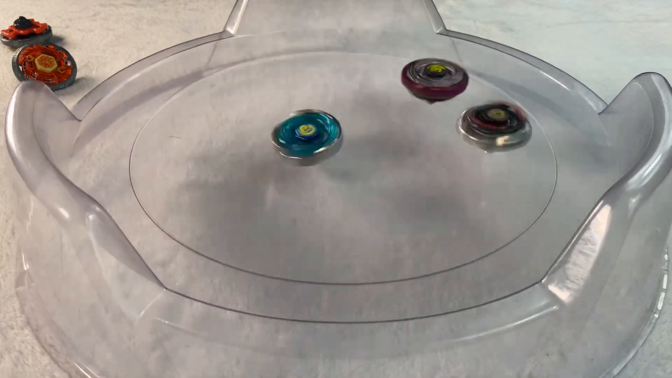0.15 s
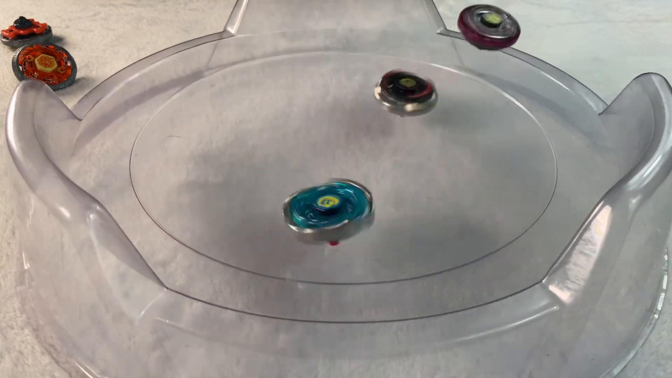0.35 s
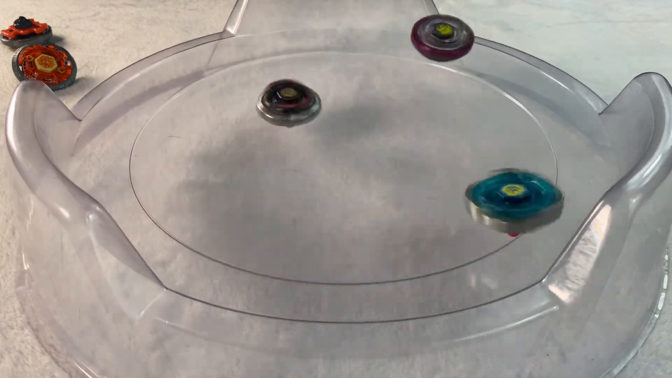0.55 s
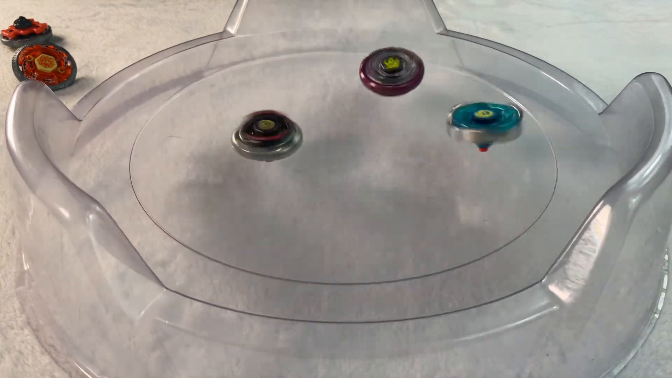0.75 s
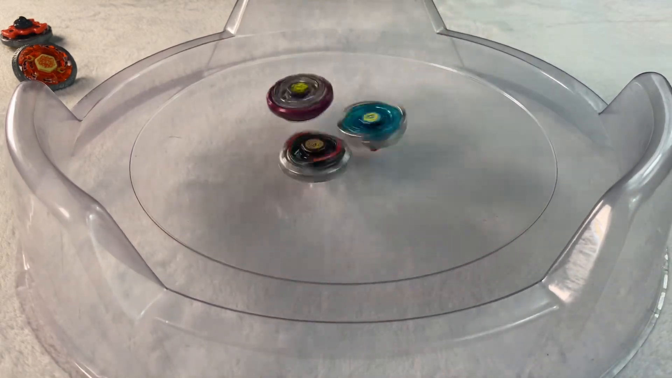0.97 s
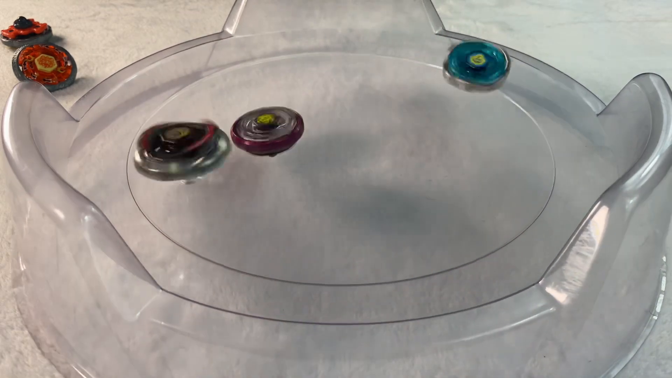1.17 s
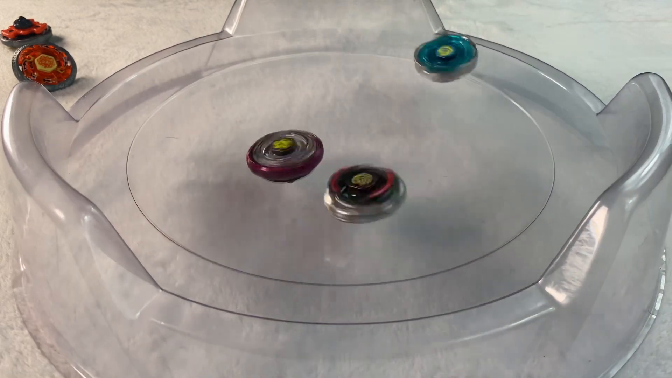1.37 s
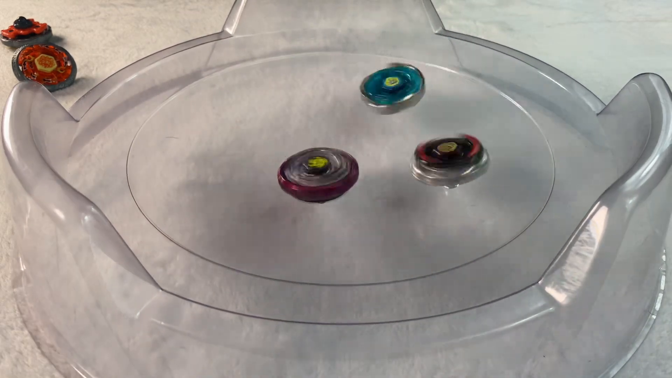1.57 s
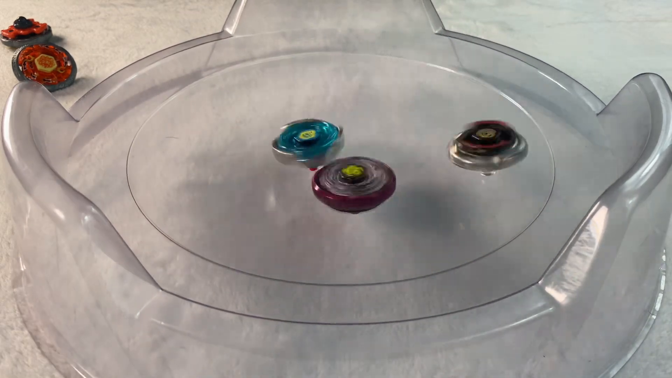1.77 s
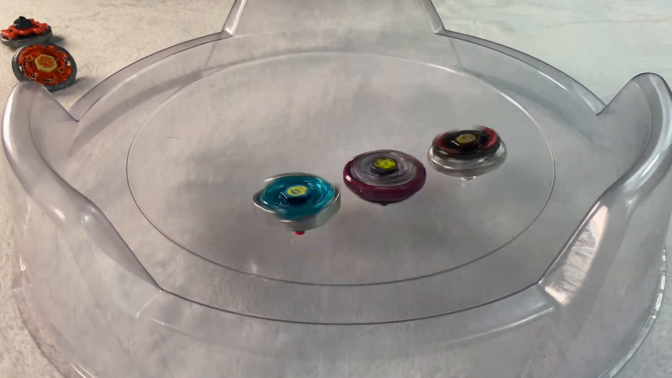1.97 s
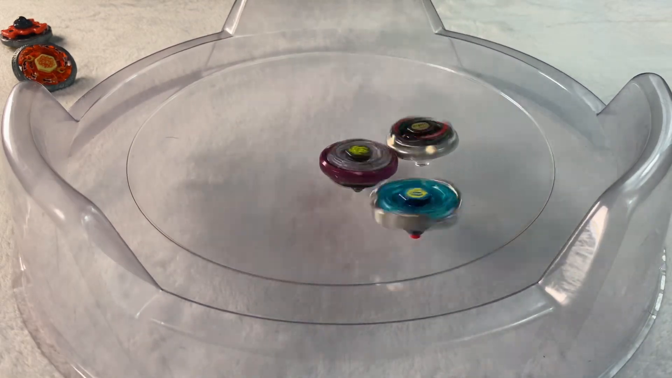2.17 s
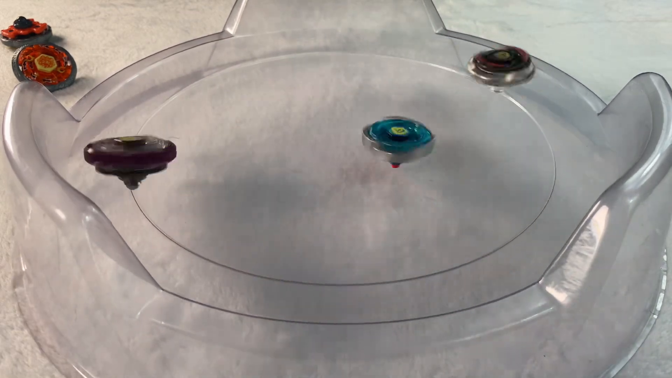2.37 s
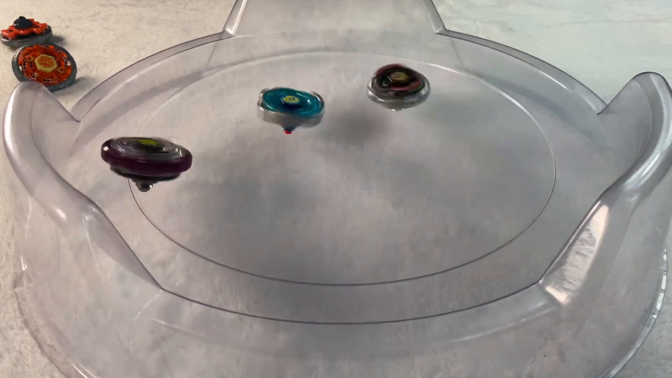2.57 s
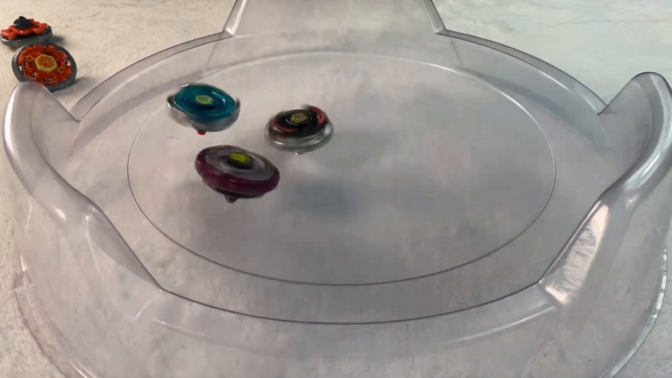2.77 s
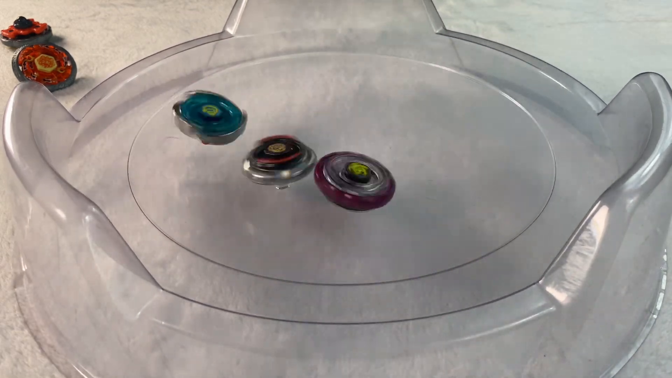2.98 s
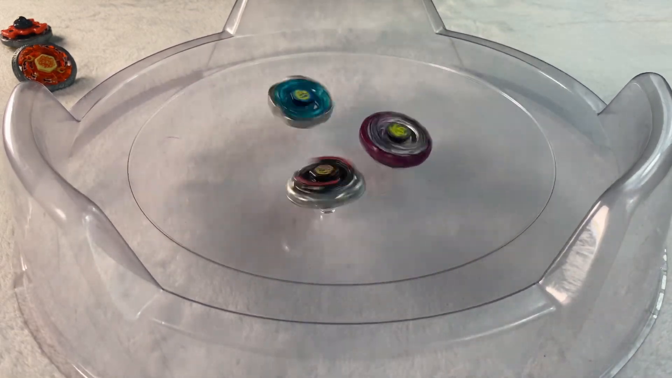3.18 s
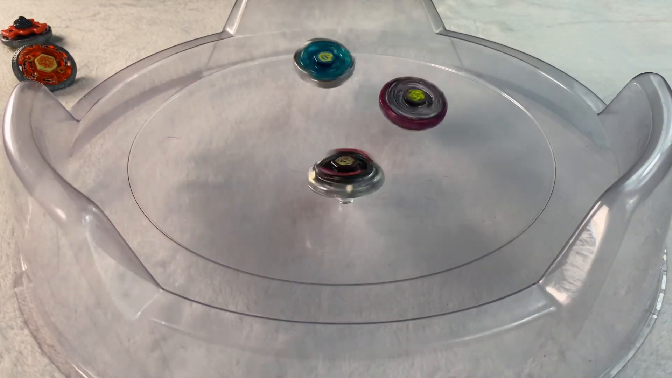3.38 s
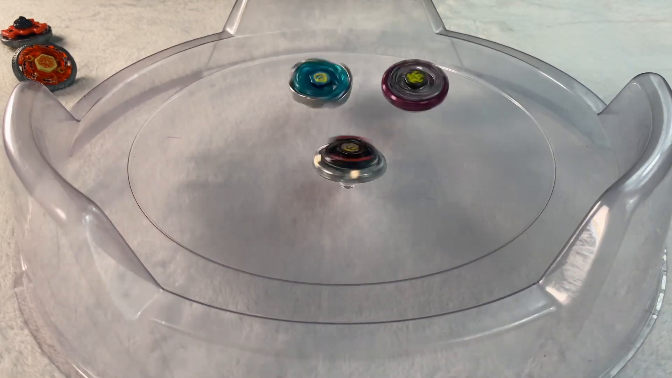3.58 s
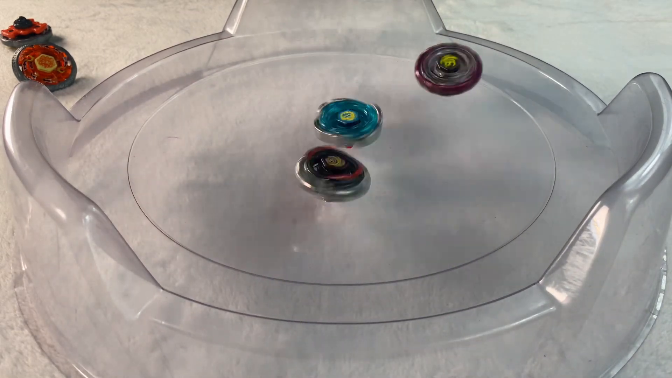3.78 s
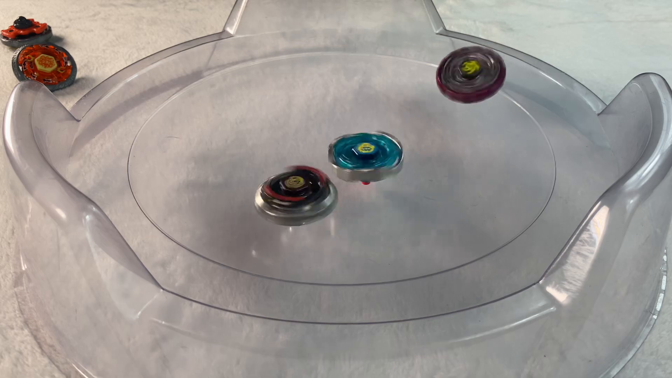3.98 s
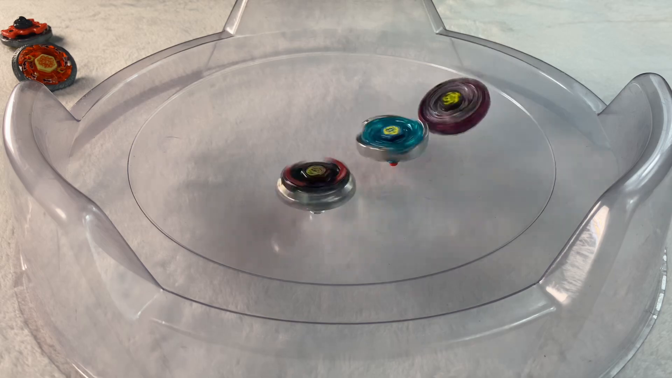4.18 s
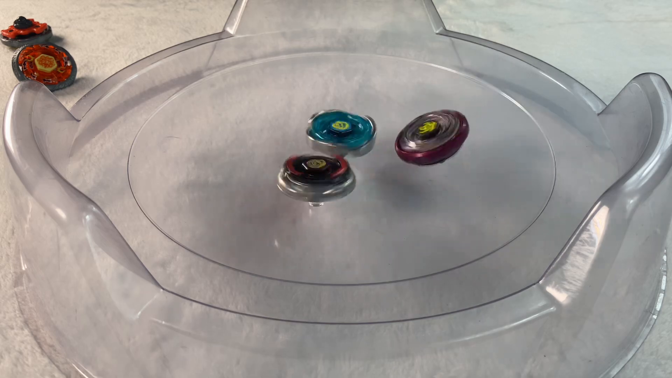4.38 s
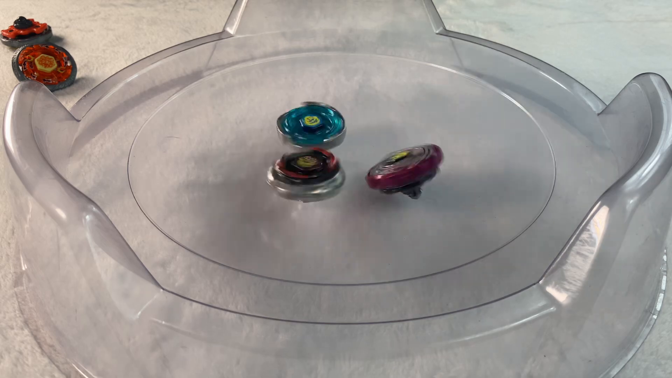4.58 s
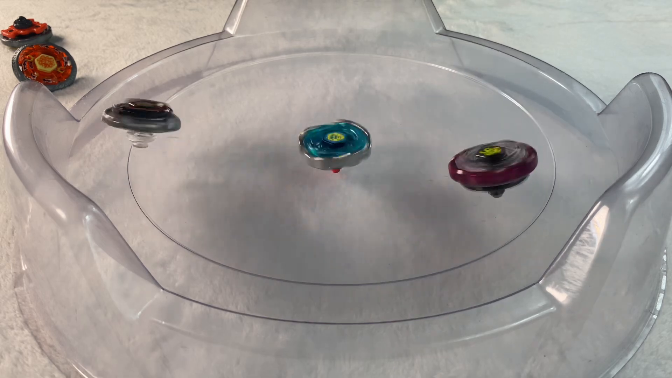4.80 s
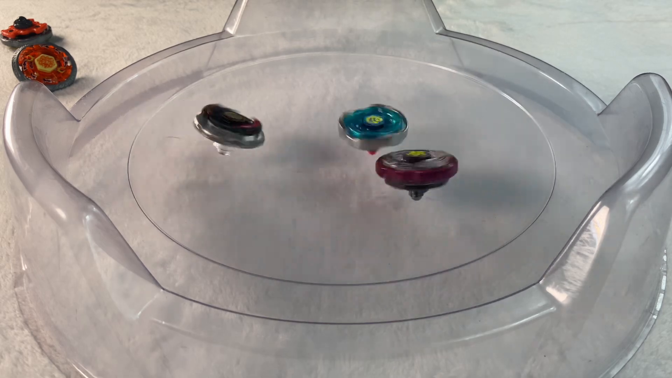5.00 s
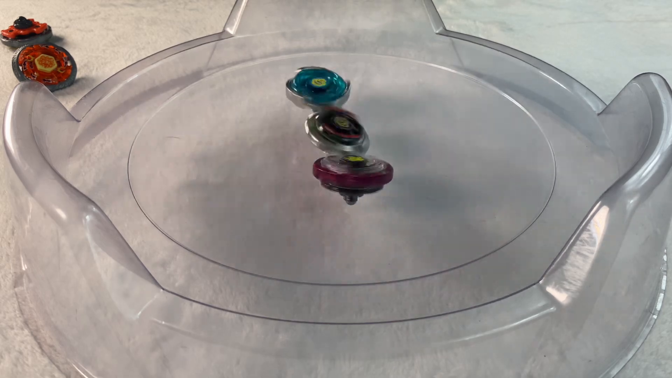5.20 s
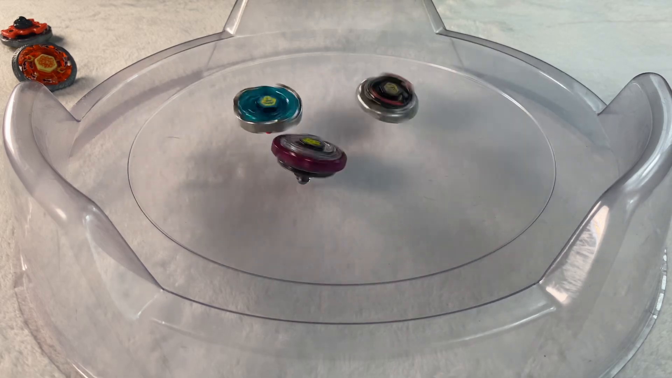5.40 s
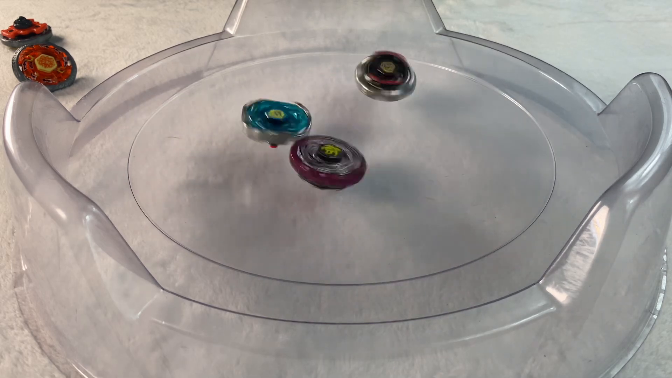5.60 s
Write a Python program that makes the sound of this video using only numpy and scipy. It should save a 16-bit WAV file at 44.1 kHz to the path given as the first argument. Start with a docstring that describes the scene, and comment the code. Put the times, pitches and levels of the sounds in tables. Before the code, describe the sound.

Metal tops spin in a hollow plastic bowl, heard very close in stereo in a small room. A low rumble and gritty scrape flutter about fifty times a second, rising and sinking throughout. Two bright metallic clashes crack at 0.14 and 0.26 s, followed by light ticks and knocks. Clashes at 0.85, 0.94 and 1.0 s lead to a hard plastic knock at 1.09, then a double clack with a boomy thump near 1.3. Single clicks fall at 1.7 and 2.0; a strong clash at 2.2 sets off skittering ticks. Lighter hits come at 2.76 and around 3.1, then rapid ticking from 3.3 to 3.7. A tight cluster of clashes rings at 3.75, with smaller clicks until 4.4. A clash at 4.6 brings a rattle of knocks until 4.9. Further hits sound at 5.0 and 5.45, ticks between, and the loudest ringing clash at 5.62 ends it.

```python
"""Low rumble, scrape and ticks are heard first, then the clashing and ringing rims of three metal spinning tops.
They run in a thin plastic bowl, close to a two-port microphone in a small room. Rims are noise bursts with
damped sines; landings, ticks and rolling are forces filtered by resonances; decaying noise is the room's answer."""
import sys
import numpy as np
from scipy import signal
from scipy.fft import rfft, irfft, next_fast_len
from scipy.io import wavfile
from scipy.ndimage import uniform_filter1d, map_coordinates

SR = 44100
rng = np.random.default_rng(int(sys.argv[2]) if len(sys.argv) > 2 else 0)


def pcm_store(signal):
    """Save signal as 16-bit PCM."""
    levels = np.round(np.clip(np.atleast_2d(signal), -1, 1) * 32767)
    wavfile.write(sys.argv[1], SR, levels.astype(np.int16).T)


N = 249158

# Noise spectrum of a hard contact. Each row: frequency in Hz, relative density in dB per Hz.
CRACK = [(350, -57), (600, -37.5), (1340, -8), (2410, -0.5), (3190, -9), (5050, -3), (6130, -9.5),
         (8930, -10), (10700, -12), (12100, -12), (13200, -25), (15100, -41), (16700, -69.5)]


def amp(db):
    """Level to gain: 20 dB is a factor of ten in amplitude."""
    return 10 ** (np.asarray(db) / 20)


def unit(x):
    """Normalization by the root mean square, to rms 1."""
    return x / np.sqrt(np.mean(x ** 2, axis=-1, keepdims=True) + 1e-20)


def along(points, hz):
    """Interpolation of (Hz, value) points on a logarithmic frequency axis."""
    f, v = np.transpose(points)
    return np.interp(np.log(hz + 1), np.log(f + 1), v)


def filtered(x, response):
    """Linear filtering: the spectrum is multiplied by a complex response of frequency."""
    n = x.shape[-1]
    m = next_fast_len(n + 4096, True)
    return irfft(rfft(x, m) * response(np.fft.rfftfreq(m, 1 / SR)), m)[..., :n]


def wobble(rate):
    """Slow random modulation: a smooth curve through random knots, rate of them a second."""
    knots = rng.standard_normal(int(N * rate / SR) + 4)
    return map_coordinates(knots, [np.arange(N) * rate / SR])


def add(track, s, sound):
    """Superposition: a sound is mixed in at a time in seconds."""
    at = round(s * SR)
    track[..., at:at + sound.shape[-1]] += sound


def ringing(hz, db, t60, t):
    """Modal sum: sines with exponential decay."""
    return np.sum(amp(np.c_[db] - 60 * t / np.c_[t60]) * np.sin(2 * np.pi * np.c_[hz] * t), axis=0)


def bowl(hz, lo_hz, hi_hz):
    """Modal response: the bowl's resonances between two frequencies, summed with alternating sign."""
    # Modes of the plastic bowl. Each row: frequency in Hz, width in Hz, level in dB.
    bowl_modes = [(58, 24, -7), (79, 12, 2), (125, 40, -5.5), (170, 50, -9), (257, 40, -3), (322, 40, -1),
                  (380, 35, -1), (450, 35, -10), (562, 45, -7), (725, 40, -2), (850, 45, -3), (985, 45, -5),
                  (1116, 45, -4), (1220, 50, -6), (1500, 120, -11)]
    return sum((-1) ** k * amp(db) * 1j * hz * w / (c * c - hz * hz + 1j * hz * w)
               for k, (c, w, db) in enumerate(bowl_modes) if lo_hz <= c < hi_hz)


def air():
    """Partly coherent background noise: the room rumbles low and steadily, partly alike at both ports."""
    # Rumble spectrum. Each row: frequency in Hz, relative density in dB per Hz.
    rumble_spectrum = [(20, -23.5), (40, -10.5), (60, 1), (90, -5.5), (140, -27.5), (300, -58)]
    near, far = rng.standard_normal((2, N))
    noise = near + .3 * far * np.c_[[1, -1]]
    return amp(-48) * unit(filtered(noise, lambda hz: amp(along(rumble_spectrum, hz))))


def room(x):
    """Reverberation: each frequency dies at its own speed, with a new tail every third of a second."""
    # Reverberation of the room. Each row: frequency in Hz, t60 in seconds.
    room_t60 = [(200, 0.13), (2000, 0.31), (6000, 0.27), (12000, 0.16), (13500, 0.033), (16000, 0.041)]
    out, step = np.zeros((2, N + 2 * SR)), SR // 3
    for at in range(0, N, step):
        hz, t, z = signal.stft(rng.standard_normal((2, SR // 2)), SR, nperseg=256)
        decay = amp(-60 * t / along(room_t60, hz)[:, None])
        tail = signal.istft(z * decay, SR, nperseg=256)[1]
        tail = tail / np.linalg.norm(tail[0])
        answer = signal.fftconvolve(x[None, at:at + step], tail, axes=1)
        add(out, at / SR + 0.004, answer)  # the answer starts 4 ms late
    return out[:, :N]


def rolling():
    """Rotating imbalance: tops press on the bowl once a turn, so rumble and scrape throb at the spin rate."""
    # Tips rolling on the bowl. Each row: time in seconds, then boom, drum and scrape before balance, in dB.
    roll_levels = [(0.0, -43, -52, -50), (0.11, -47, -43, -52.5), (0.31, -46.5, -49.5, -49.5),
                   (0.71, -53.5, -50.5, -55.5), (0.91, -54.5, -55.5, -64.5), (1.05, -54, -51.5, -46),
                   (1.18, -50, -44, -47), (1.3, -44.5, -51, -54.5), (1.48, -43, -56.5, -51.5),
                   (1.64, -45, -47, -60), (1.809, -52.5, -53.5, -55.5), (2.05, -52.5, -60.5, -72),
                   (2.25, -46, -59, -51.5), (2.39, -43.5, -51, -52), (2.67, -49, -46, -53),
                   (2.819, -40, -49.5, -53), (3.4, -62, -59, -61), (3.65, -55, -54, -60.5),
                   (3.81, -40, -43, -49.5), (3.98, -63, -57, -59.5), (4.25, -43.5, -54, -56),
                   (4.83, -71, -57, -57.5), (5.07, -39, -46, -55.5), (5.27, -51, -45, -54),
                   (5.46, -46.5, -47, -57.5), (5.65, -62, -60, -65)]
    # Hiss of the tips. Each row: time in seconds, level before balance in dB.
    hiss_levels = [(0.0, -55.5), (0.28, -46.5), (0.49, -57), (0.69, -62.5), (0.89, -64), (1.02, -45),
                   (1.26, -59), (1.35, -62), (1.51, -65.5), (1.81, -64), (2.06, -76), (2.25, -47),
                   (2.41, -60), (2.55, -57), (3.02, -59), (3.13, -75), (3.29, -64.5), (3.41, -54),
                   (3.68, -81.5), (3.81, -48), (4.06, -62), (4.34, -57), (4.47, -61), (4.86, -60),
                   (5.4, -68.5), (5.65, -51)]
    # Spectrum of scrape and hiss. Each row: frequency in Hz, relative density in dB per Hz.
    scrape_spectrum = [(290, -45.5), (500, -12.5), (797, -12.5), (926, -16.5), (1080, -14), (1420, -15),
                       (1860, -15.5), (2190, -20.5), (4290, -10.5), (5720, 1), (5960, -6), (9250, -16.5),
                       (11200, -10), (13200, -36.5), (14000, -83)]
    spin_hz = 51.8  # mean; the rate wanders around it

    s, *columns = np.transpose(roll_levels)
    t = np.arange(N) / SR
    levels = [np.interp(t, s, column) for column in columns]
    levels = np.array(levels + [np.interp(t, *np.transpose(hiss_levels))])

    turn = np.cumsum(spin_hz * (1 + 0.1564 * wobble(6))) / SR

    def press(depth_db):
        return amp(depth_db * np.cos(2 * np.pi * turn) + 1.5 * wobble(25))

    # tips graze in small bursts, one a turn, of random strength
    strength = amp(4 * rng.standard_normal(int(turn[-1]) + 1))
    graze = strength[turn.astype(int)] * np.exp(-(turn % 1) / .12)
    rub = press(1.3) + 1.2 * graze

    near, far = rng.standard_normal((2, 4, N))
    force = near + np.c_[[.2, .25, .5, .3]] * far * [[[1]], [[-1]]]  # part differs from port to port
    force = force * amp(2.5 * wobble(18)) * [press(.5), press(1.5), rub, rub]

    def parts(hz):
        high = 1 / (1 + (3200 / (hz + 1)) ** 6)
        rasp = amp(along(scrape_spectrum, hz)) * (1 + 0.32 * abs(bowl(hz, 500, 2000)))
        return np.array([bowl(hz, 0, 200), bowl(hz, 200, 500), rasp * (1 - high), rasp * high])

    balance_db = np.c_[[3, 2, 2.5, -1.5]]  # boom, drum, scrape, hiss
    return np.sum(unit(filtered(force, parts)) * amp(levels + balance_db), axis=1)


def ticks():
    """Impact excitation: a tip's landing or skip excites a short resonance at its pitch, with a bright edge."""
    # Tips on the plastic. Each row: start in seconds, level before balance in dB, pitch in Hz,
    # bright edge over the knock before balance and scatter in dB.
    tip_skips = [(0.0648, -47, 2010, -18), (0.1446, -22.5, 3960, -3), (0.3618, -31.5, 1900, -4.5),
                 (0.4479, -40, 1950, -7.5), (0.467, -48, 2500, -4), (0.4873, -38.5, 1920, -6.5),
                 (0.5084, -48, 2840, -8), (0.622, -36.5, 1940, -3.5), (0.788, -49, 2660, -6),
                 (1.0853, -15, 3830, -12), (1.1014, -17, 2000, -3), (1.1846, -33.5, 3400, -17),
                 (1.249, -31.5, 1810, 4), (1.3653, -31, 1720, -4.5), (1.4107, -31.5, 1570, -3),
                 (1.4489, -32.5, 1740, -0.5), (1.5208, -45.5, 1700, 0.5), (1.5454, -43.5, 1880, -2),
                 (1.988, -48.5, 3000, 2), (2.007, -46, 3000, -3), (2.2734, -36, 2550, -1),
                 (2.3009, -37.5, 4940, 3.5), (2.3585, -39.5, 1960, -0.5), (2.385, -30.5, 4480, -4),
                 (2.4, -31, 3000, -11), (2.4098, -29, 4180, -24), (2.4174, -40.5, 2470, 5.5),
                 (2.474, -37.5, 2530, -24), (2.5007, -48, 1990, -13), (2.5464, -40, 2680, -8),
                 (2.5726, -40.5, 2000, -7.5), (2.8883, -46.5, 1930, 0), (2.93, -42.5, 4240, -22),
                 (2.9743, -45, 1920, -5), (3.0254, -53, 1740, -9), (3.288, -50, 2500, -24),
                 (3.3111, -34.5, 2500, -14.5), (3.331, -34.5, 2490, -15), (3.3473, -34.5, 2750, -12),
                 (3.367, -40, 3020, -17), (3.3832, -36, 2900, -11), (3.4027, -35, 3150, -20),
                 (3.418, -40.5, 3100, -5), (3.4398, -37.5, 2860, -17.5), (3.4554, -42.5, 2600, -16),
                 (3.49, -46.5, 3100, -7.5), (3.513, -53, 3180, -14.5), (3.5862, -38, 2430, -10),
                 (3.6107, -33, 2360, -16), (3.6282, -36, 2650, -5), (3.644, -39.5, 2740, -1),
                 (3.6624, -37, 2500, -7), (3.681, -37, 3100, -2.5), (3.8164, -44, 3620, -8.5),
                 (3.8364, -48, 2000, -13), (3.8517, -32.5, 2010, -9), (3.8701, -31, 2030, -8),
                 (3.9007, -38.5, 3420, -18), (3.9144, -43, 3220, -11), (3.9794, -44, 3590, -26),
                 (4.0013, -49, 3600, -9), (4.0415, -46, 1640, -6.5), (4.082, -46, 1770, 4.5),
                 (4.124, -43.5, 3120, 0.5), (4.5361, -40, 1550, -14), (4.665, -31, 2000, -5),
                 (4.6977, -35, 4350, -1), (4.7237, -30.5, 1720, -2.5), (4.7606, -39, 4820, 4.5),
                 (4.789, -33.5, 4990, -7), (4.8111, -33.5, 3800, 1), (4.8177, -36, 4400, -8),
                 (4.8324, -35, 2790, -15), (4.8498, -37, 1930, -3), (4.8704, -44, 2790, -18),
                 (4.9, -38.5, 3010, -9), (4.9303, -37, 2410, -6.5), (5.1756, -34, 1700, -9.5),
                 (5.1995, -40, 1730, -3), (5.222, -30.5, 1640, -14), (5.241, -39, 1650, -27),
                 (5.2848, -40.5, 1630, -5.5), (5.3248, -45.5, 2460, 1.5), (5.3688, -36, 1620, -9),
                 (5.3971, -32, 1810, -5.5), (5.418, -42, 4100, -7)]
    graze_s = .004
    out, t = np.zeros(N + SR), np.arange(SR // 25) / SR
    decay = amp(-60 * t / 0.11) * (1 - np.exp(-(t / 0.00013) ** 2))
    for s, db, pitch, edge_db in tip_skips:
        def body_and_edge(hz):
            resonance = 1j * hz * pitch / (pitch ** 2 - hz ** 2 + 1j * hz * .42 * pitch)
            plastic = 1.5 * pitch * bowl(hz, 1000, 2000) / 1000  # the bowl's upper modes
            bright = amp(along(CRACK, hz)) * (hz > 2200) * (hz < 12800)
            return np.array([resonance ** 2 + plastic, bright])

        drag = .03 + .3 * (t < graze_s) * np.sin(np.pi * t / graze_s)  # the tip drags briefly
        force = drag * rng.standard_normal(len(t))
        force[round(.0004 * SR)] = 1  # the impact
        body, edge = unit(filtered(force, body_and_edge) * decay)
        edge_gain = amp(edge_db + 5 + 1.5 * rng.standard_normal())
        add(out, s, amp(db - 20.0) * (body + edge_gain * edge))
    return out[:N]


def drops():
    """Dispersion: a landing pushes the bowl; bending waves are slower in the bass, so the boom trails the slap."""
    # Tops land on the bowl or hit its wall. Each row: start in seconds, then levels before balance
    # of knock, boom, drum and slap in dB.
    landings = [(0.264, -32, -66, -40, -50.5), (0.31, -31.5, -38, -36, -47.5), (0.33, -43, -37, -33.5, -45),
                (0.358, -34.5, -37, -32.5, -50), (0.449, -43, -40, -40, -49),
                (0.62, -30, -48.5, -36.5, -44), (1.003, -40.5, -32.5, -32.5, -42.5),
                (1.032, -44.5, -32, -36.5, -41), (1.086, -11, -38.5, -21.5, -28),
                (1.1, -20.5, -35, -33, -27), (1.248, -28.5, -20.5, -24.5, -34),
                (1.282, -40.5, -33, -43, -55), (1.306, -41, -39, -35, -47), (1.364, -38.5, -25, -33.5, -40),
                (1.411, -37.5, -29.5, -37.5, -46.5), (1.447, -38, -31.5, -37, -48.5),
                (1.474, -43, -35, -41, -58.5), (1.694, -35.5, -48, -44, -42.5),
                (2.204, -41.5, -32, -33, -47.5), (2.231, -46.5, -31, -44, -45.5),
                (2.271, -36, -31.5, -37, -47.5), (2.302, -31, -33, -27.5, -47.5),
                (2.357, -44, -48.5, -36, -48), (2.386, -25.5, -46, -34, -43.5),
                (2.407, -29, -54, -41, -44.5), (2.419, -40.5, -54.5, -33, -67),
                (2.574, -32.5, -48.5, -38, -62), (3.134, -40.5, -40, -38, -53),
                (3.816, -44.5, -36.5, -44, -49.5), (3.853, -46, -32, -39.5, -41.5),
                (3.872, -34, -49.5, -35, -42.5), (3.887, -45, -36, -39.5, -44),
                (3.914, -37.5, -33, -37.5, -42.5), (4.611, -37, -32, -35.5, -39),
                (4.664, -31, -25.5, -31.5, -45), (4.698, -47, -36, -36, -57), (4.725, -33, -37, -30.5, -44),
                (4.76, -38.5, -37, -34, -44), (4.789, -37.5, -41, -39, -54), (4.812, -31, -53, -33.5, -47),
                (4.832, -45, -45, -33.5, -47.5), (5.044, -40, -44, -36.5, -44.5),
                (5.08, -42.5, -48, -45, -49), (5.201, -45, -39, -37.5, -47.5)]
    trail = .16  # s times root Hz, how far the bass trails
    balance_db = np.c_[[-19, -9.5, -10.5, -11]]
    out, t = np.zeros((2, N + SR)), np.arange(SR // 6) / SR - .01

    def parts(hz):
        # travel time falls with the root of frequency, counted from the arrival at 500 Hz
        travel = trail * (np.sqrt(hz) - hz / (2 * np.sqrt(500)))
        late = np.exp(-2j * np.pi * travel) / (1 + (hz / 1500) ** 4)
        boom = bowl(hz, 0, 200) * late * hz ** 0.2  # a blow favours the upper boom modes
        return np.array([bowl(hz, 500, 1000), boom, bowl(hz, 200, 500) * late, bowl(hz, 1000, 2000)])

    for s, *levels in landings:
        # the contact chatters
        near, far = amp(-60 * t / 0.18) * (t > 0) * rng.standard_normal((2, len(t)))
        # the wide bowl reaches each port a little differently
        differing = np.c_[[.8, .2, .3, .8]] * far * np.array([[[1]], [[-1]]])
        force = np.c_[[.06, .01, .05, .07]] * (near + differing)
        force[..., np.argmax(t > 0)] = 1  # the blow
        # the top's weight damps the struck bowl
        sounds = unit(filtered(force, parts) * amp(-60 * t / 0.34))
        add(out, s + t[0], np.sum(sounds * amp(np.c_[levels] + balance_db), axis=1))
    return out[:, :N]


def clashes():
    """Impact and modal ringing: each clash is a burst that dies band by band, and sets the wheels ringing."""
    # Rim against rim. Each row: start in seconds; edge, middle and body in dB; ring of the plastic core,
    # of each of the three wheels and of the longest mode in dB; first snap over the burst in dB;
    # loudest pitches in Hz (one of body, two of middle, two of edge), set by where the rims meet.
    # All levels but the snap's stand before balance and scatter.
    rim_hits = [(0.1359, -16.5, -22, -30, -31.5, -33, -40.5, -53.5, -50.5, 9.5, 3224, 7220, 6184, 10770, 11300),
                (0.2582, -16.5, -18.5, -23.5, -40.5, -30.5, -47.5, -57, -51, 8, 4650, 6004, 6220, 10780, 11340),
                (.848, -25, -29.5, -32.5, -35, -56, -49, -55.5, -49.5, 9, 3280, 7200, 6860, 11810, 12040),
                (0.9421, -21, -30.5, -31, -41, -48, -55, -62.5, -53, -5, 2680, 6070, 6990, 10830, 11980),
                (1.0044, -13, -15.5, -22.5, -30.5, -40, -50, -68, -55, -4, 3610, 6550, 7300, 10770, 11410),
                (1.3077, -22, -22, -33, -47, -56.5, -55, -52, -59, 3, 3800, 6000, 5480, 10790, 11330),
                (1.3153, -19, -25.5, -26, -38, -53, -54, -58.5, -51, 4.5, 3880, 5430, 6080, 11390, 10830),
                (1.6963, -20, -26, -27, -36, -66, -54, -66.5, -55.5, 10.5, 4500, 5550, 6680, 11720, 10310),
                (2.0225, -24, -31, -37.5, -31.5, -53, -56.5, -58.5, -58, 2, 1500, 5710, 6300, 9910, 11500),
                (2.2, -14, -16.5, -21, -35.5, -41, -46.5, -59, -51.5, -4, 3990, 5570, 6200, 11500, 9730),
                (2.758, -23, -29.5, -27.5, -36.5, -56.5, -56.5, -56, -58.5, 13, 2674, 6310, 5410, 10320, 11470),
                (3.0705, -25.5, -27, -34.5, -39.5, -68, -60, -73, -67, 11, 2585, 5790, 6680, 12020, 10540),
                (3.1294, -26.5, -32, -32, -40, -65.5, -55, -49.5, -73, -19, 3810, 5780, 6280, 11360, 9680),
                (3.714, -24.5, -39, -32.5, -41, -37, -50, -49, -44, 11, 3760, 6260, 6330, 12010, 9650),
                (3.74, -16.5, -22, -22.5, -31.5, -43, -46, -59, -55.5, 8, 4390, 7300, 6540, 11730, 11110),
                (3.764, -27, -22.5, -21, -38.5, -38, -65, -61, -58, 2, 3290, 6160, 7220, 9470, 11910),
                (3.9356, -34, -32, -34, -35, -61, -54, -77, -63.5, -12, 3180, 7970, 7300, 9520, 12100),
                (4.173, -22.5, -20.5, -35, -30, -46, -45.5, -57, -48, -11, 3880, 6190, 6620, 11730, 9820),
                (4.2825, -34.5, -37.5, -35.5, -44.5, -64, -63, -66, -60, 14.5, 3700, 5520, 6720, 11730, 10200),
                (4.3869, -26.5, -27, -29, -37.5, -58, -64, -72.5, -67, -2, 3246, 5970, 6690, 12010, 11700),
                (4.6033, -19.5, -19, -22.5, -31, -36, -44.5, -69, -50, 5.5, 3160, 6030, 5600, 10200, 14800),
                (5.013, -24.5, -27, -19.5, -33, -33.5, -66, -60, -44.5, 11.5, 2764, 6390, 5660, 10790, 9740),
                (5.455, -19.5, -26, -23.5, -29, -31.5, -72, -56, -50.5, 2, 2680, 6410, 6570, 10800, 11350),
                (5.621, -10.5, -17, -23, -19.5, -42, -39.5, -56, -42, -21, 3670, 7210, 8050, 10730, 11160)]
    # Centres in Hz of the bands core, body, middle, edge, edge.
    band_hz = [1400, 3200, 6300, 11000, 14500]
    # Decay of the burst: t60 in seconds, one for each band.
    band_t60 = [0.086, 0.018, 0.05, 0.027, 0.077]
    # Balance of the burst's bands in dB.
    band_balance_db = [-3.5, 3, 1, 2, -7.5]
    # Wheel modes that die with the burst. Each row: nominal Hz, dB over the band before scatter, t60 in seconds.
    short_modes = [(1950, -2, .03), (2700, -1, .035), (4500, -4, .03), (5450, -4, .035), (6900, -3, .035),
                   (7800, -8, .05), (9550, -7, .04), (9850, -6, .04), (10350, -6, .04), (10760, 1, .045),
                   (11400, -4, .06), (11490, -4, .06), (11730, -3, .05), (12050, -8, .05), (14000, -12, .1),
                   (14700, -12, .13), (15300, -12, .06)]
    # Wheel modes that ring on, split in two by the spin. Each row: Hz, nominal split in Hz, t60 in seconds.
    lasting_modes = [(1505, 30, .045), (3265, 45, .085), (3620, 60, .4), (4045, 75, .3), (5780, 110, .1),
                     (6215, 135, .15), (6520, 90, .09), (7250, 70, .1)]
    # Index of the ring level (core, three wheels, longest mode) that sets each lasting mode.
    ring_column = [0, 2, 4, 3, 2, 1, 2, 1]
    # Balance of the lasting modes in dB.
    mode_balance_db = [-3.5, 11.5, 1.5, 2.5, -5, -3, -5.5, -13]
    # The loudest pitches: dB over their band, then t60 in seconds.
    struck_balance_db = [0.56, 3, 0.82, 4, 2.8]
    struck_t60 = [.022, .03, .03, .025, .025]
    snap_t60, sizzle_t60 = 0.035, 0.22  # s
    sizzle_db = -19  # a faint sizzle lasts on under the burst

    out, t = np.zeros((2, N + SR)), np.arange(SR // 3) / SR
    rise = 1 - np.exp(-t / 0.0012)
    short_hz, short_db, short_t60 = np.transpose(short_modes)
    long_hz, split, long_t60 = np.transpose(lasting_modes)
    bands_count, modes_count = len(band_hz), len(lasting_modes)

    def band_spectra(hz):
        share = np.array([along(list(zip(band_hz, row)), hz) for row in np.eye(bands_count)])
        return amp(along(CRACK, hz)) * share ** 2

    for s, edge_db, middle_db, body_db, *rest in rim_hits:
        wheel_db, snap_db, struck_hz = rest[:5], rest[5], rest[6:]
        band_db = np.array([wheel_db[0], body_db, middle_db, edge_db, edge_db]) + band_balance_db
        band_db = band_db + .8 * rng.standard_normal(bands_count)
        ring_db = np.array(wheel_db)[ring_column] + mode_balance_db
        ring_db = ring_db + 1.5 * rng.standard_normal(modes_count)

        bands = unit(filtered(rng.standard_normal(len(t)), band_spectra))
        snap = 1 + amp(snap_db - 60 * t / snap_t60)
        sizzle = amp(sizzle_db - 60 * t / sizzle_t60)
        fade = amp(-60 * t / np.c_[band_t60]) * snap + sizzle
        crack = np.sum(bands * amp(np.c_[band_db]) * fade, axis=0)

        pitch_scatter, level_scatter = rng.standard_normal((2, len(short_modes)))
        level_db = short_db + along(list(zip(band_hz, band_db)), short_hz) + 4 * level_scatter
        short = ringing(short_hz * (1 + 0.00823 * pitch_scatter), level_db, short_t60, t)

        lean = rng.normal(0, 4, modes_count)  # one of each pair is struck harder
        apart = split * rng.uniform(.25, .7, modes_count)  # drawn anew for each clash
        lasting = ringing(long_hz - apart, ring_db + lean, long_t60, t)
        lasting = lasting + ringing(long_hz + apart, ring_db - lean, long_t60, t)

        # random modulation roughens the ring; the end is faded out
        modulation = unit(uniform_filter1d(rng.standard_normal(len(t)), size=110))
        rough = amp(4.5 * modulation - 60 * (t / t[-1]) ** 8)
        struck = ringing(struck_hz, band_db[[1, 2, 2, 3, 3]] + struck_balance_db, struck_t60, t)
        burst = amp(-5) * crack + (amp(-8) * short + struck) * np.sqrt(rough)
        add(out, s, rise * (amp(0.5) * burst + amp(1.5) * lasting * rough))
    return out[:, :N]


def scene():
    """Superposition of hits near the microphone, their room, the rolling and the room's rumble."""
    metal, thumps, taps = clashes(), drops(), ticks()
    # the bowl radiates little bass far away
    thin = filtered(thumps.mean(axis=0), lambda hz: 1j * hz / (1j * hz + 400))
    sent = amp(-14.0) * metal.mean(axis=0) + amp(-11.0) * thin + amp(-10.0) * taps
    return metal + thumps + taps + room(sent) + rolling() + air()


def record(dry):
    """Band-limited reception: two ports differ in phase and colour; deepest bass and highest treble are cut."""
    # Phase between the ports. Each row: frequency in Hz, radians the left port leads.
    port_lead = [(0, 0), (690, 0.9), (3270, 1.7), (4130, 0.0), (6550, 6.6), (6890, 6.8), (8350, 3.6),
                 (9390, 2.9), (10500, 0.4), (11500, -0.2), (12700, -2.7), (13700, -3.5), (15100, -6.4),
                 (16500, -6.2)]
    # Colour of the ports. Each row: frequency in Hz, left over right in dB.
    port_colour = [(60, -0.5), (180, -4), (550, 1), (1650, 0.5), (4970, 2.5), (15000, 0.0)]
    half = np.c_[[.5, -.5]]  # each port takes half the difference

    def response(hz):
        cut = (1j * hz / (1j * hz + 25)) ** 2 * (hz < 16850)
        phase = np.exp(1j * half * np.interp(hz, *np.transpose(port_lead)))
        return amp(half * along(port_colour, hz)) * phase * cut

    return filtered(dry, response)


dry = scene()
out = record(dry)
pcm_store(out)
```